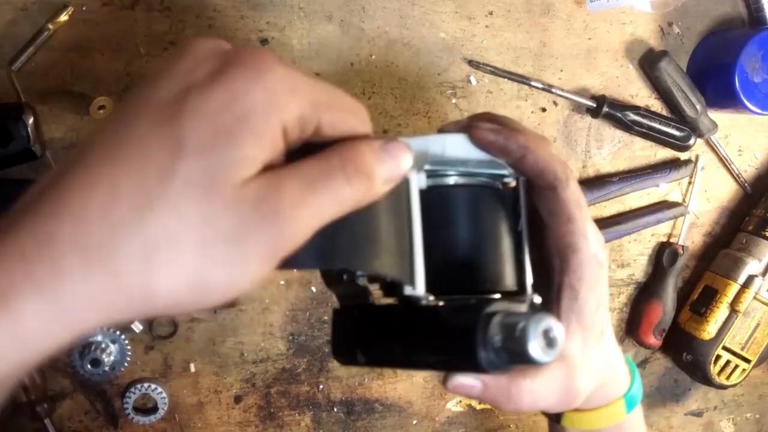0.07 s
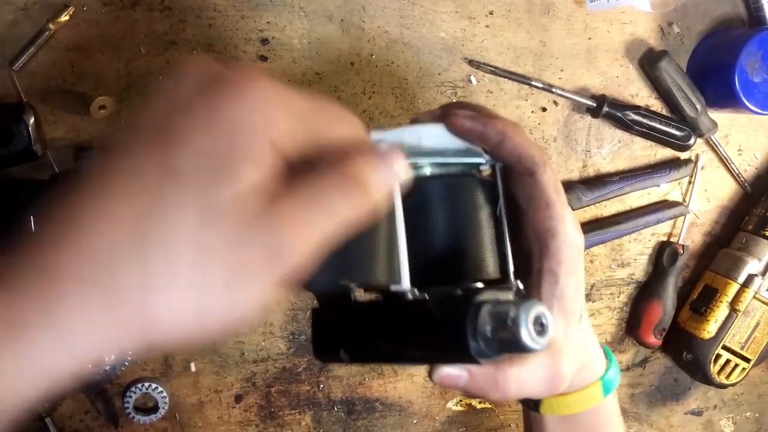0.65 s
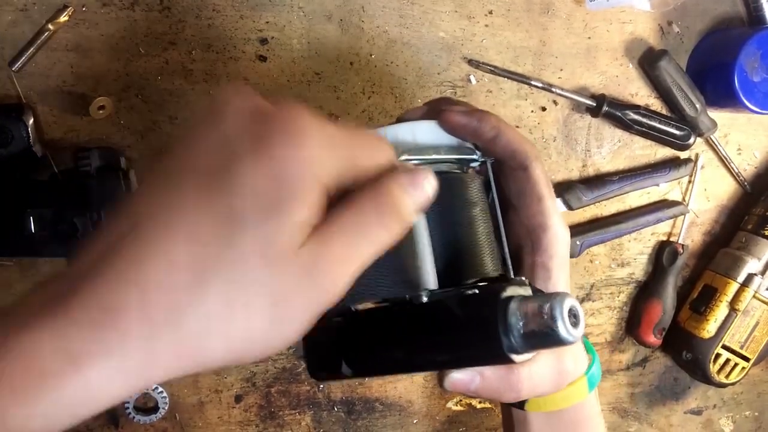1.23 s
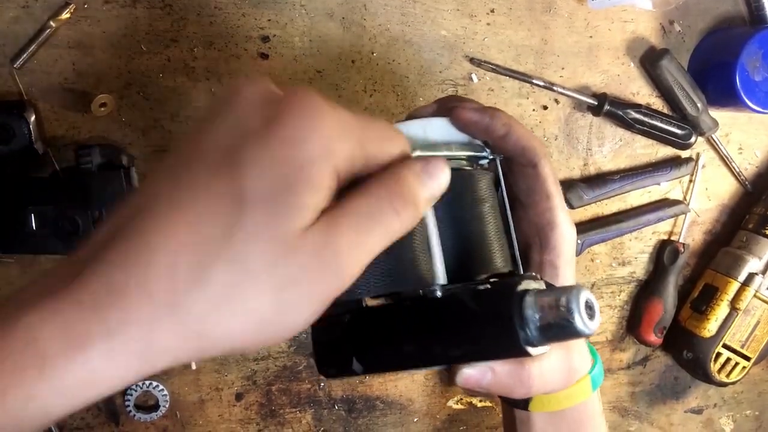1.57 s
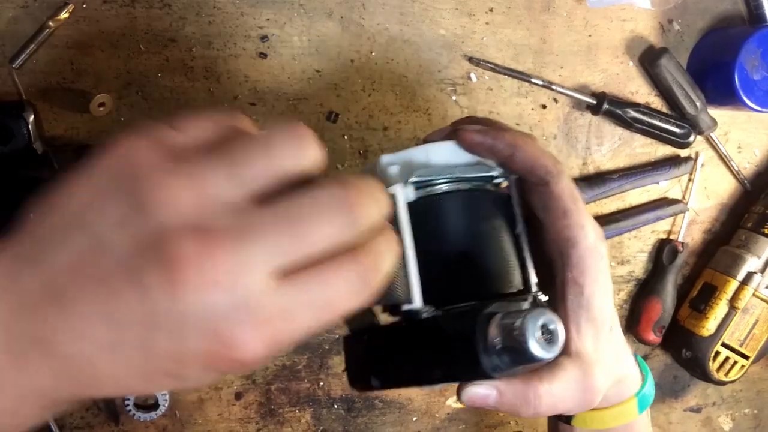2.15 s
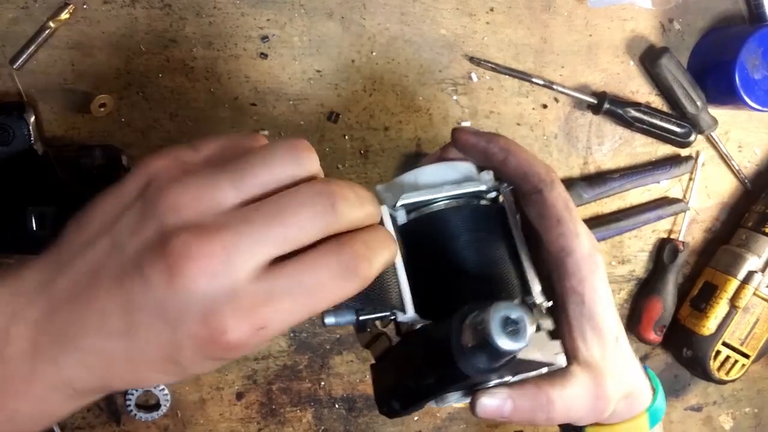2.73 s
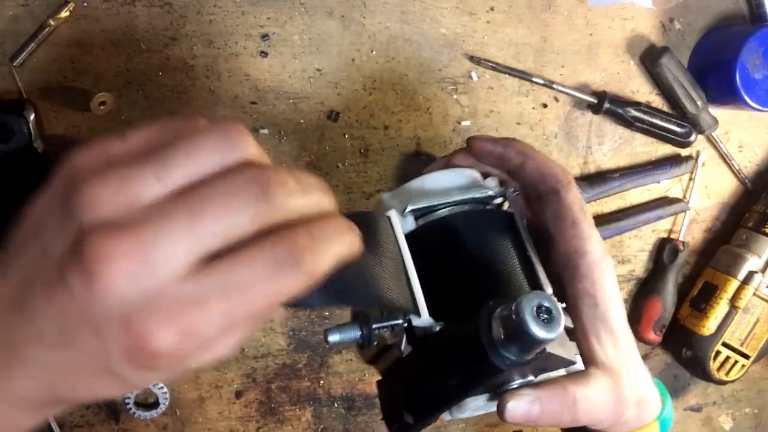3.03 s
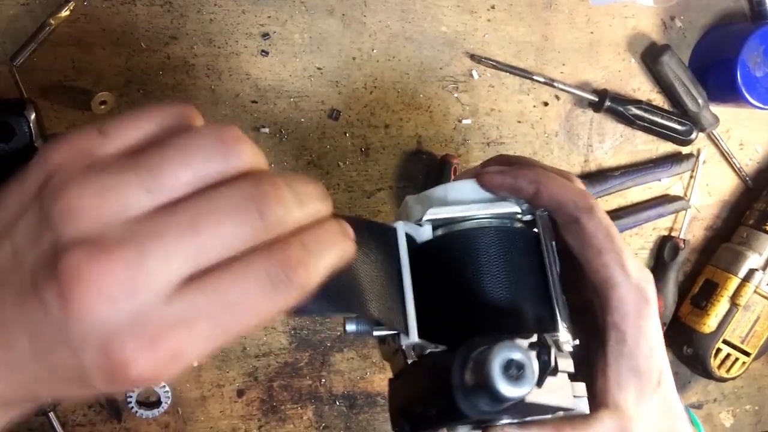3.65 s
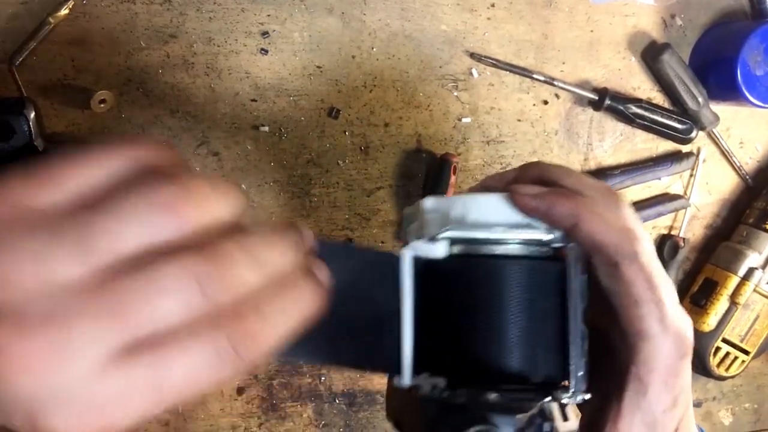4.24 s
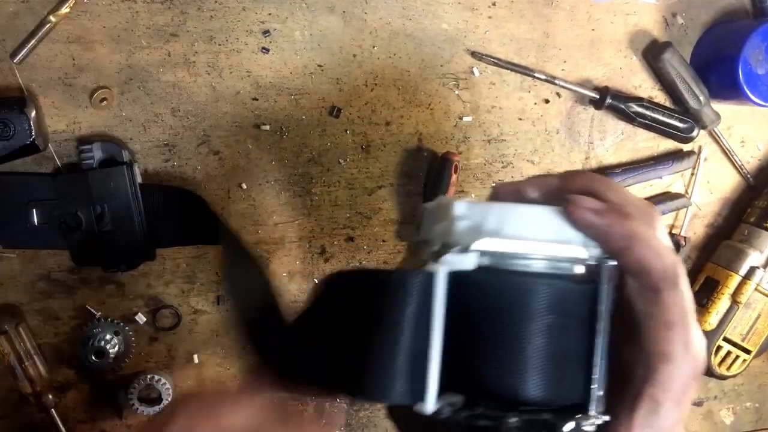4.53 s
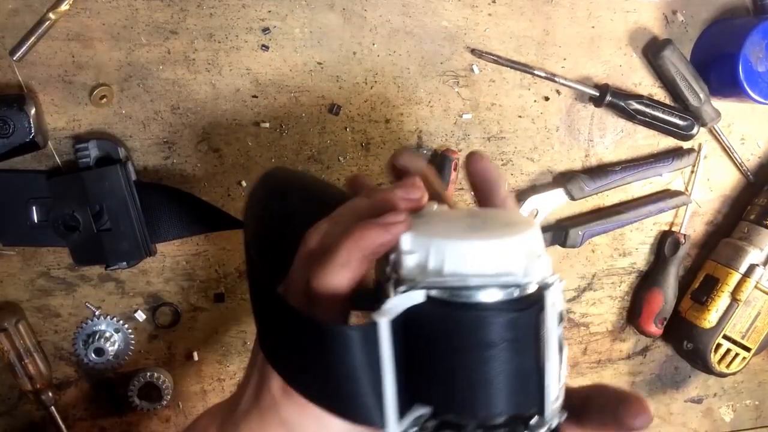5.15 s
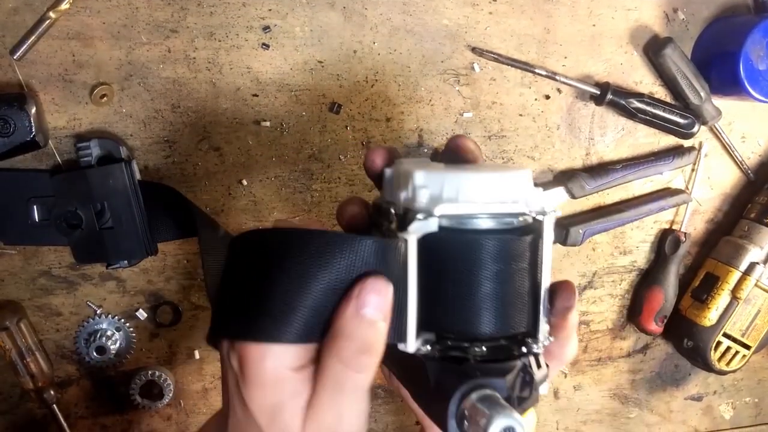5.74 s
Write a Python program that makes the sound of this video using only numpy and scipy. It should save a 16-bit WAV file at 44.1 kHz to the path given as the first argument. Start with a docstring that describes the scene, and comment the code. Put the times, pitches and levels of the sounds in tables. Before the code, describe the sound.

A seatbelt retractor is tugged by hand again and again, locking with sharp metallic clicks and rattling lightly as the belt winds back.

```python
"""A workshop, close over the bench: hands hold a seatbelt retractor and tug its webbing again and again.
At each tug the slack drags in, the pawl ticks onto the ratchet and the steel frame locks with a snap;
then the spool bounces, and rattles as the faintly humming spring draws the webbing back.
The belt is let go and its loose end clunks on the bench before one last tug. It is all heard with a
short room echo, through two microphone ports, the left one muffled, and a noise gate."""
import sys
import numpy as np
from scipy import signal
from scipy.fft import rfft, irfft
from scipy.io import wavfile
from scipy.ndimage import uniform_filter1d

SR = 44100
rng = np.random.default_rng(int(sys.argv[2]) if len(sys.argv) > 2 else 0)


def transcribe(signal):
    """Save signal, clipped to [-1, 1], as a 16-bit WAV file at the path in sys.argv[1]."""
    frames = np.atleast_2d(signal).T
    limited = np.clip(frames, -1, 1)
    pcm = np.round(limited * 32767).astype(np.int16)
    wavfile.write(sys.argv[1], SR, pcm)


N = 264159
RING = 16384  # samples for a hit or an echo to ring out
USUAL_FORCE_DB = -20  # an ordinary tug


def amp(db):
    """Decibels to gain."""
    return 10 ** (np.asarray(db) / 20)


def unit_rms(x):
    """Scales to rms 1."""
    return x / np.sqrt(np.mean(x ** 2) + 1e-20)


def curve(points, hz):
    """Joins (f/Hz, value) points on a log-frequency axis."""
    f, value = np.transpose(points)
    return np.interp(np.log(hz + 1), np.log(f + 1), value)


def add(mix, s, sound):
    """Mixes a sound in at time s."""
    part = mix[max(0, round(s * SR)):][:len(sound)]
    part += sound[:len(part)]


def colour(points):
    """The causal frequency response of an EQ curve (f/Hz, level/dB)."""
    log_gain = np.log(amp(curve(points, abs(np.fft.fftfreq(RING, 1 / SR)))))
    return np.exp(np.conj(signal.hilbert(log_gain)))[:RING // 2 + 1]


def through(x, response):
    """Passes a long sound through a frequency response."""
    return signal.oaconvolve(x, irfft(response))[:N]


def noise(points):
    """Steady noise of rms 1, shaped by an EQ curve (f/Hz, level/dB)."""
    gain = amp(curve(points, np.fft.rfftfreq(N, 1 / SR)))
    return unit_rms(irfft(rfft(rng.standard_normal(N)) * gain, N))


def swell(start_s, rise_s, hold_s, fade_s):
    """Attack, hold and release envelope; the hold counts from the start."""
    out, t = np.zeros(N), np.arange(SR) / SR
    add(out, start_s, np.minimum(t / rise_s, 1) * np.exp(-np.maximum(t - hold_s, 0) / fade_s))
    return out


# Low bed of hands and bench: f/Hz, level/dB
RUMBLE_EQ = [(20, -34), (40, -21), (68, 3), (82, -2.5), (98, 0), (130, -5.5), (190, -16.5), (300, -20),
             (700, -42)]
def handling(grip_db=-55, landing_db=-55):
    """The hands rumble all the time, swelling after each tug and as the belt end lands."""
    jolts = [(s, db) for s, *_, db in BELT_TUGS] + [(END_HITS[0][0], landing_db)]
    power = sum((amp(db) * swell(s, rise_s=.07, hold_s=.11, fade_s=.05)) ** 2 for s, db in jolts)
    return np.sqrt(amp(grip_db) ** 2 + power) * noise(RUMBLE_EQ)


# Tone of the housing, the light hollow spool, the bright cover and the steel on top: f/Hz, level/dB
HOUSING_EQ = [(100, -28), (300, -15.5), (650, -12.5), (950, -3), (1300, -0.5), (1750, -4), (2250, -1.5),
              (2800, -7), (3500, -10), (4600, -37.5)]
SPOOL_EQ = [(100, -34.5), (300, -29), (700, -26), (880, -6.5), (1050, -3), (1300, 2.5), (1550, -12.5),
            (1900, -4.5), (2250, -3.5), (2650, -13), (3100, -11.5), (4600, -41.5)]
COVER_EQ = [(2500, -24.5), (3600, -4.5), (4300, -1.5), (5100, 0), (6200, -2), (6900, -4.5), (8500, -33)]
STEEL_EQ = [(5500, -27.5), (7000, -4), (8000, -3), (8900, -4.5), (9600, 0.5), (10600, -9.5), (11500, -17.5),
            (13000, -20.5), (14000, -15.5), (15400, -16.5), (16300, -27.5)]
# The retractor's metallic ring: f/Hz, t60/s, level/dB over the broad tone
RETRACTOR_MODES = [(980, 0.08, -3), (1137, 0.081, -3), (1230.5, .09, 1.5), (1430, 0.14, -0.5),
                   (2326, 0.19, 0), (3127, .05, -4), (3946, 0.024, -4), (4915, 0.059, -6),
                   (5230, .07, -2.5), (5670, .06, -6.5), (6260, .08, 3.5), (7920, .05, -0.5),
                   (7980, 0.066, -4), (8800, 0.092, -1), (9380, 0.035, -6.5), (9660, .045, -0.5),
                   (11100, 0.14, -6)]
def body(low_eq, modes=RETRACTOR_MODES):
    """An object to strike: its low, middle and high responses, and its modes."""
    return [colour(eq) for eq in (low_eq, COVER_EQ, STEEL_EQ)], np.array(modes)


def resonances(modes, drift=0.0065):
    """The ring of one blow: each contact point favours other modes, and the grip detunes them."""
    hz, t60, db = modes.T[:, :, None]
    hz = hz * (1 + drift * rng.standard_normal(hz.shape))
    off_tune = (np.fft.rfftfreq(RING, 1 / SR) - hz) * (2 * np.pi * t60 / np.log(1000))
    peaks = rng.uniform(.2, 2.6, hz.shape) * amp(db) / (1 + off_tune ** 2)
    return 1 + peaks.sum(0) - 1j * (peaks * off_tune).sum(0)


def strike(struck, levels_db, hold_s, fade_s, rise_s, low_lag):
    """A burst of tiny contacts rings each part of a body; levels are rms over the first 10 ms."""
    parts, modes = struck
    ringing = resonances(modes)
    out = np.zeros(RING)
    for part, db, slowness in zip(parts, levels_db, (low_lag, 1, 1)):
        t = np.arange(RING // 4) / SR / slowness  # the low part starts and dies at its own pace
        envelope = (1 - np.exp(-t / rise_s)) * np.exp(-np.maximum(t - hold_s, 0) / fade_s)
        chatter = envelope * rng.standard_normal(len(t))
        ring = irfft(rfft(chatter, RING) * part * ringing)
        out += amp(db) * ring / np.sqrt(np.mean(ring[:SR // 100] ** 2))
    return out


# The spool hits its stops and bearings: t/s, level/dB, hardness/dB (cover over spool)
SPOOL_HITS = [(0.01, -45, -8.5), (0.082, -27.5, 3.5), (0.1107, -33.5, 4), (0.2076, -32, -1.5),
              (0.2663, -40.5, -3), (0.283, -43, -4), (0.3448, -35.5, 11), (0.3727, -35.5, 2),
              (0.4648, -28, 1), (0.719, -31.5, 2.5), (0.844, -24, 3.5), (0.8523, -20, -5),
              (0.9484, -31.5, -16), (1.0067, -43.5, -6), (1.1513, -27.5, -1), (1.259, -34.5, -15.5),
              (1.279, -39.5, -17), (1.433, -23.5, -6), (1.5213, -28.5, -17.5), (1.585, -44.5, -5),
              (1.74, -31.5, -1.5), (1.748, -30, -4.5), (1.7864, -35.5, -20), (1.814, -36, -20),
              (2.4972, -34, -1.5), (2.581, -46, -31), (2.9592, -31.5, 1.5), (3.328, -28, -1),
              (3.407, -40, -25), (3.4429, -43.5, -12), (3.4714, -39, -20), (3.515, -38, -21),
              (3.7733, -47.5, -8.5), (3.953, -40.5, 2.5), (3.987, -38, -26), (4.0338, -47.5, -14),
              (4.0693, -44, -7), (4.0926, -50, -2.5), (4.379, -46.5, -22.5), (4.4313, -57, 6.5),
              (5.062, -56.5, -4.5), (5.118, -60, -10.5), (5.309, -70, 15.5), (5.478, -55, -23.5),
              (5.8799, -23, 4.5), (5.931, -28.5, 3.5), (5.948, -29.5, -9)]
def knocks(spool, steel_db=-11):
    """Knocks, snatches, rebounds and rattles ring the spool; hard ones reach the cover and steel."""
    out = np.zeros(N)
    for s, db, hardness_db in SPOOL_HITS + snatches() + rebounds() + rattles():
        levels_db = db + np.array([0, hardness_db, hardness_db + steel_db])
        add(out, s, strike(spool, levels_db, hold_s=.0015, fade_s=.003, rise_s=.00077, low_lag=1.5))
    return amp(-1) * out


def take_ups(usual_s=0.027, s_per_db=.0021):
    """Slack drags in before each lock, more slowly on a gentle tug: rows of t/s, length/s, level/dB."""
    s, _, force_db, _, db, *_ = np.transpose(BELT_TUGS)
    length_s = usual_s + s_per_db * (USUAL_FORCE_DB - force_db)
    return list(zip(s - length_s, length_s, db))


def snatches(hardness_db=-1.5):
    """The belt snatches with a dry tick as each take-up starts: rows for knocks()."""
    return [(s, db - 0.5, hardness_db) for s, _, db in take_ups()]


# The webbing scuffs its guide as the grip changes: t/s, length/s, level/dB
GUIDE_SCUFFS = [(2.178, 0.034, -49), (2.678, 0.051, -51), (3.114, 0.051, -48), (5.381, .06, -59.5)]
def webbing(spool, grains_per_s=5000, spread_db=2, lurch_db=3):
    """Sliding webbing feeds a fine, lurching rustle into spool and cover on take-up, recoil and scuff."""
    grains = rng.standard_normal(N) * amp(spread_db * np.minimum(rng.exponential(1, N), 4))
    grains *= rng.random(N) < grains_per_s / SR
    grains *= amp(lurch_db * noise([(1, 0), (50, 0), (120, -60), (300, -100)]))
    parts, _ = spool
    hollow, bright = (unit_rms(through(grains, part)) for part in parts[:2])
    take_up = sum(amp(db) * swell(s, .011, length_s, .005) for s, length_s, db in take_ups())
    recoil = sum(amp(db) * swell(s, .03, length_s, .02) for s, *_, length_s, db, _ in BELT_TUGS)
    scuff = sum(amp(db) * swell(s, .0056, length_s, .0073) for s, length_s, db in GUIDE_SCUFFS)
    drag = amp(-1.5) * (hollow + amp(-7) * bright) * take_up
    slide = (amp(-3) * hollow + amp(-11) * bright) * (recoil + scuff)
    return drag + slide


# One cue a tug: lock t/s, pawl lead/s, force/dB, extra cover ring/dB, take-up level/dB,
# recoil length/s, recoil level/dB, hand shake level/dB
BELT_TUGS = [(0.0595, 0.0051, -19, -1, -44.5, .24, -52.5, -65),
             (0.3123, 0.0034, -19.5, -1, -45, .22, -50.5, -59.5),
             (0.5545, 0.0048, -17, -3, -48, 0.25, -55.5, -52.5),
             (0.8228, 0.0027, -21, -1, -47.5, 0.22, -60, -65.5),
             (1.1175, 0.0026, -22, 1, -47.5, .2, -53.5, -65),
             (1.3984, 0.0043, -18, 2, -46.5, 0.22, -53, -56),
             (1.7035, 0.0017, -24.5, 4, -47.5, 0.15, -56.5, -54),
             (2.4194, 0.0048, -29.5, 0, -52, .17, -79, -60),
             (2.906, .005, -26, -1.5, -49.5, .14, -56.5, -52.5),
             (3.3054, 0.006, -19, 1, -46, .19, -57, -55),
             (3.6029, 0.0053, -24.5, -2.5, -51, .14, -56.5, -51),
             (3.9156, 0.0036, -27, -3, -57.5, 0.21, -57.5, -54),
             (4.2626, 0.005, -26.5, 2, -46, .13, -63.5, -45.5),
             (5.8646, .0046, -19, -3.5, -46.5, 0.063, -45, -49.5)]
def snaps(frame):
    """The pawl ticks onto a tooth, then the spool slams against it; hard tugs bring out the steel."""
    out = np.zeros(N)
    for s, lead_s, force_db, ring_db, *_ in BELT_TUGS:
        excess_db = force_db - USUAL_FORCE_DB
        tick_db = -24 + 1.15 * excess_db + np.array([-14, -11, -2])
        lock_db = [-20 + 1.02 * excess_db,  # housing
                   -23.5 + 0.77 * excess_db + ring_db,  # cover
                   -15.5 + 1.3 * excess_db]  # steel
        add(out, s - lead_s, strike(frame, tick_db, hold_s=.002, fade_s=.0097, rise_s=.0003, low_lag=1))
        add(out, s, strike(frame, lock_db, hold_s=.0014, fade_s=.0076, rise_s=.00044, low_lag=1.15))
    return amp(0.16) * out


def rebounds(count=2, first_gap_s=0.022, gap_ratio=.62, first_db=-13, loss_db=8.5, hardness_db=-7.5):
    """After each lock the spool bounces on the pawl, ever quicker and weaker: rows for knocks()."""
    rows = []
    for s, _, force_db, *_ in BELT_TUGS:
        gaps_s = first_gap_s * gap_ratio ** np.arange(count) * rng.uniform(.8, 1.2, count)
        times = s + np.cumsum(gaps_s)
        rows += [(at, force_db + first_db - loss_db * k, hardness_db) for k, at in enumerate(times)]
    return rows


def rattles(count=8, start_s=0.068, per_s=33, fade_db_per_s=25, spread_db=3, hardness_db=-17):
    """The recoiling spool rattles unevenly, dying down as it slows: rows for knocks()."""
    rows = []
    for s, *_, length_s, recoil_db, _ in BELT_TUGS:
        ages = np.cumsum(rng.uniform(.5, 1.5, count)) / per_s
        levels_db = recoil_db + 12 - fade_db_per_s * ages + spread_db * rng.standard_normal(count)
        rows += [(s + start_s + age, db, hardness_db)
                 for age, db in zip(ages, levels_db) if start_s + age < length_s]
    return rows


# Soft twangs of the spring: t/s, level/dB
SPRING_TWANGS = [(.56, -52.5), (2.2, -54.5), (4.3, -55.5)]
def spring(hz=619, t60=1.4):
    """The coiled return spring hums one faint, fading note for half a second."""
    out, t = np.zeros(N), np.arange(SR // 2) / SR
    note = np.sin(2 * np.pi * hz * t) * signal.windows.tukey(len(t), .1)
    for s, db in SPRING_TWANGS:
        add(out, s, amp(db - 60 * t / t60) * note)
    return out


# The dead ring of the belt's end fitting: f/Hz, t60/s, level/dB over the broad tone
FITTING_MODES = [(1116, 0.011, 4.5), (1260, 0.022, -7.5), (2240, 0.0086, 1), (3930, 0.0087, 8.5),
                 (5100, 0.012, 1.5)]
# Its clunks on the bench: t/s, low level/dB, middle level/dB, high level/dB
END_HITS = [(4.63, -39, -61, -77), (4.6378, -29, -34.5, -76), (4.6713, -27.5, -25, -50),
            (4.7541, -21, -25.5, -44.5), (4.806, -58, -44.5, -64.5), (4.8539, -36, -33.5, -65),
            (4.865, -32.5, -36, -65), (4.873, -32, -36, -68), (4.881, -40, -39, -60)]
def belt_end():
    """The fitting on the loose end drops on the bench, bounces and skids."""
    out, fitting = np.zeros(N), body(HOUSING_EQ, FITTING_MODES)
    for s, *levels_db in END_HITS:
        add(out, s, strike(fitting, levels_db, hold_s=.0013, fade_s=.009, rise_s=.00077, low_lag=.82))
    return amp(-0.5) * out


# Decay of the room: f/Hz, t60/s
ECHO_DECAY = [(200, 0.4), (700, 0.37), (1700, 0.4), (4600, 0.27), (9000, 0.23), (15000, 0.1)]
# Tone of its echo: f/Hz, level/dB
ECHO_EQ = [(200, -11.5), (1200, -10.5), (4500, -10), (9000, -9.5), (15000, -4.5)]
def workshop(x, count=3, echoes_per_s=5000, sway_hz=.45):
    """Short echoes off bench and walls; the tails crossfade as the hands move."""
    t = np.arange(RING) / SR
    taps = rng.standard_normal((count, RING)) * (rng.random((count, RING)) < echoes_per_s / SR)
    taps *= np.clip(t / 0.0022 - 1, 0, 1)  # pre-delay, then fade in
    hz, age, spectra = signal.stft(taps, SR, nperseg=256)
    t60 = curve(ECHO_DECAY, hz)[:, None]
    spectra = spectra / np.sqrt(t60) * amp(-60 * age / t60)
    spectra /= np.sqrt(np.sum(signal.istft(spectra, SR)[1] ** 2) / count)  # unit mean energy
    tails = signal.istft(spectra * amp(curve(ECHO_EQ, hz))[:, None], SR)[1]
    turn = 2 * np.pi * sway_hz * np.arange(N) / SR
    sends = [np.sqrt(2 / count) * np.cos(turn + np.pi * k / count) for k in range(count)]
    return sum(signal.oaconvolve(x * send, tail)[:N] for send, tail in zip(sends, tails))


# Faint steady hiss: f/Hz, level/dB
HISS_EQ = [(30, 11), (250, 10), (500, 10), (1000, 3.5), (2500, 0.5), (6000, -4), (11000, -6.5),
           (16000, -9.5)]
# The muffled left port against the right: f/Hz, level/dB
LEFT_PORT_EQ = [(60, -3), (200, -5), (400, -11), (700, -11.5), (1300, -16.5), (2400, -21.5), (4400, -26.5),
                (8000, -41.5), (15000, -36.5)]
def scene(left_delay_s=.0001, shared_echo=0.12):
    """The mechanism reaches the right port clearly and the left one late and dull, both over hiss."""
    frame, spool = body(HOUSING_EQ), body(SPOOL_EQ)
    direct = snaps(frame) + knocks(spool) + belt_end() + webbing(spool) + spring()
    echo = workshop(direct)
    rumble = handling()
    left_echo = shared_echo * echo + np.sqrt(1 - shared_echo ** 2) * workshop(direct)
    left = amp(-60) * noise(HISS_EQ)
    add(left, left_delay_s, through(direct + left_echo + rumble, colour(LEFT_PORT_EQ)))
    right = direct + echo + rumble + amp(-61) * noise(HISS_EQ)
    return np.array([left, right])


def gate(x, open_db=-47, range_db=9, depth_db=14, release_s=0.06):
    """Turns everything down whenever the sound stays quiet; opens at once, shuts slowly."""
    detector = signal.lfilter([1], [1, -np.exp(-1 / (0.0054 * SR))], (x ** 2).mean(0))
    detector *= 1 - np.exp(-1 / (0.012 * SR))  # sensitivity
    opened = np.clip((10 * np.log10(detector + 1e-12) - open_db) / range_db + 1, 0, 1)
    fall = np.arange(N) / (release_s * SR)
    opened = np.maximum.accumulate(opened + fall) - fall
    return x * amp(depth_db * (uniform_filter1d(opened, size=128) - 1))


def record(dry, ceiling=.85, edge_hz=16100):
    """Noise gate, soft overload just under full scale, then the band limit."""
    gated = gate(dry)
    clipped = gated / (1 + (gated / ceiling) ** 6) ** (1 / 6)
    lowpass = signal.firwin(255, edge_hz, window=("kaiser", 8), fs=SR)
    return signal.oaconvolve(clipped, lowpass[None], "same")


dry = scene()
out = record(dry)
transcribe(out)
```